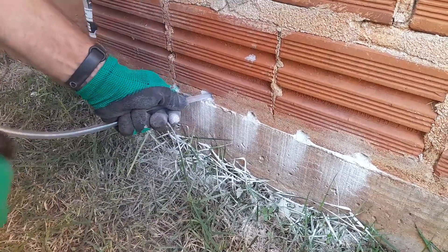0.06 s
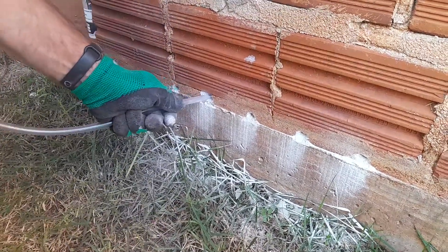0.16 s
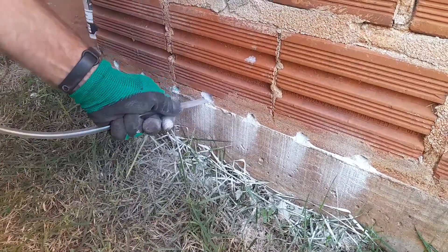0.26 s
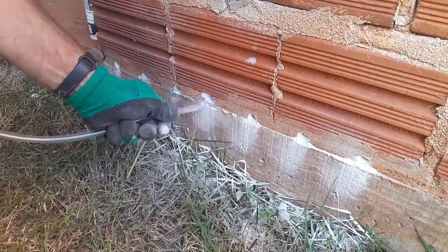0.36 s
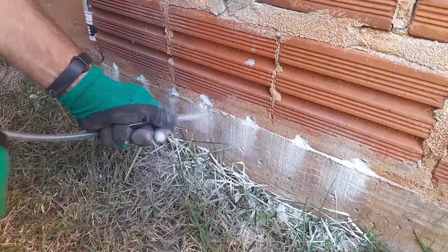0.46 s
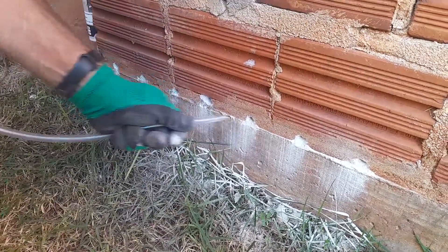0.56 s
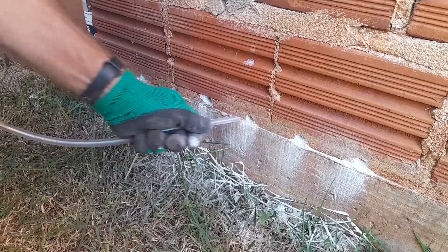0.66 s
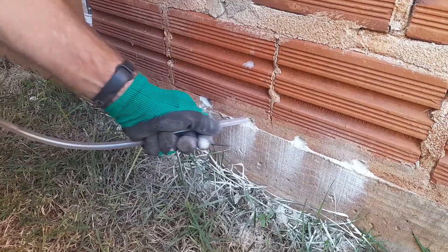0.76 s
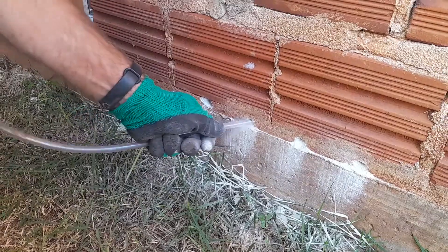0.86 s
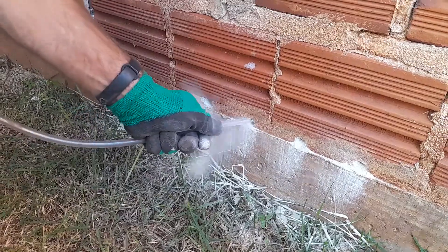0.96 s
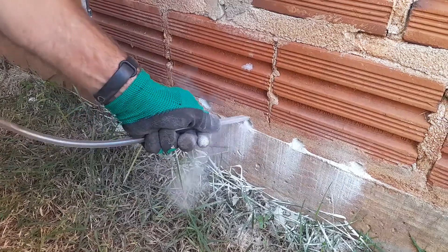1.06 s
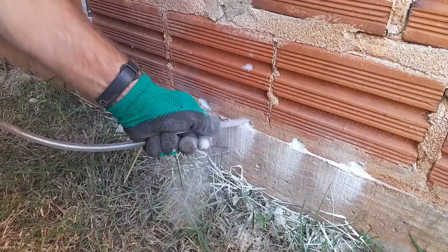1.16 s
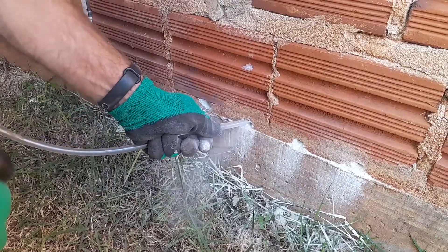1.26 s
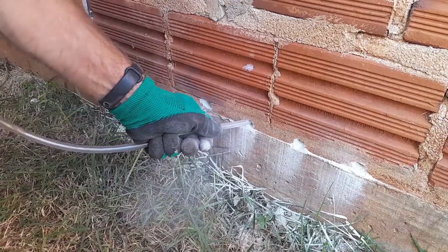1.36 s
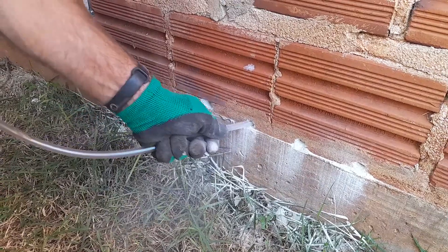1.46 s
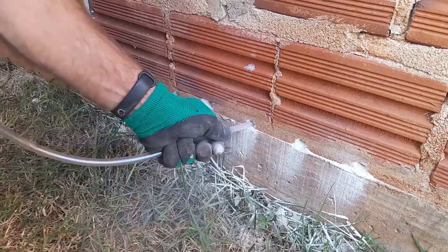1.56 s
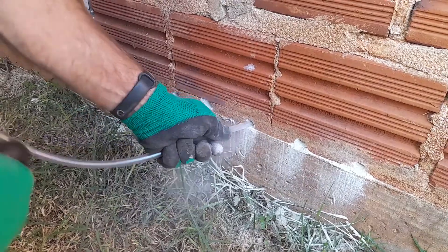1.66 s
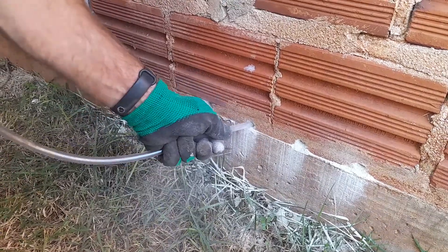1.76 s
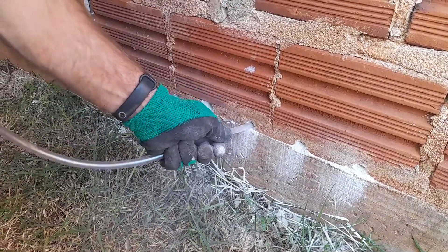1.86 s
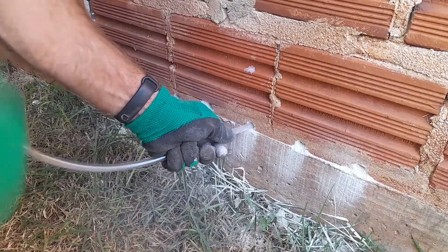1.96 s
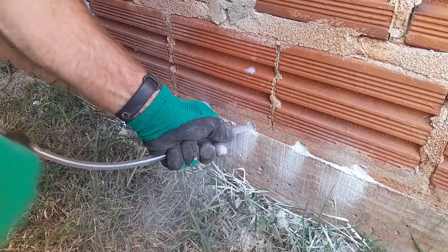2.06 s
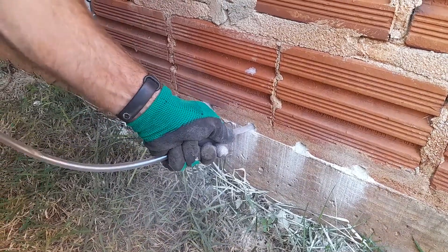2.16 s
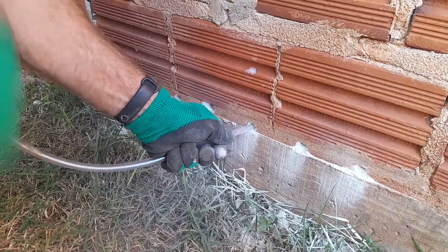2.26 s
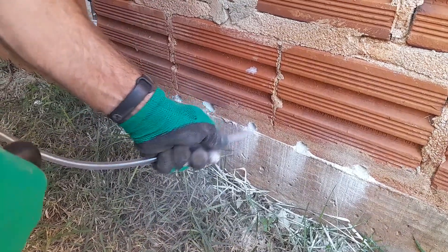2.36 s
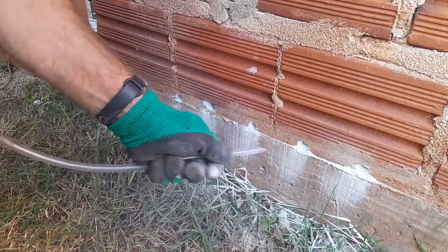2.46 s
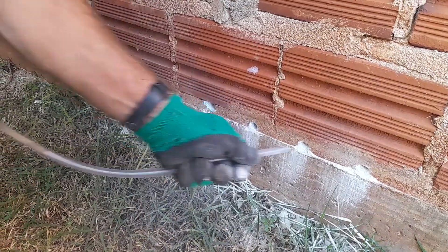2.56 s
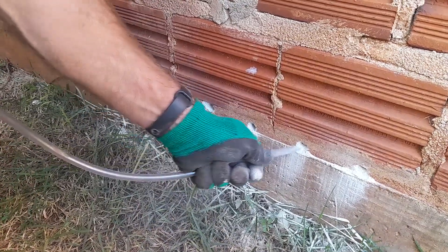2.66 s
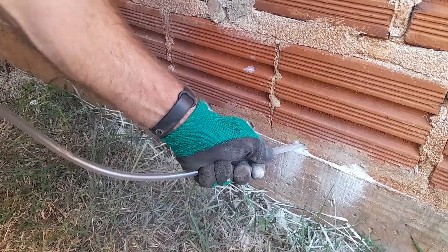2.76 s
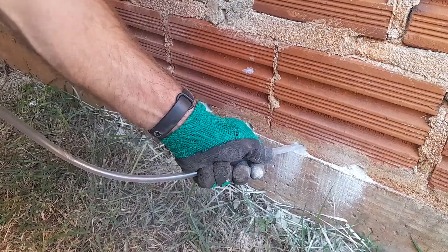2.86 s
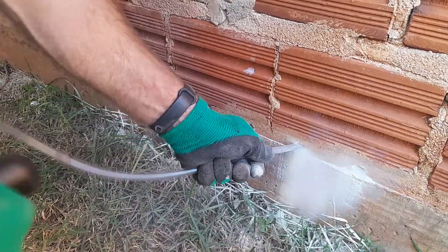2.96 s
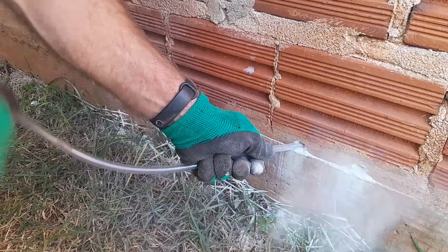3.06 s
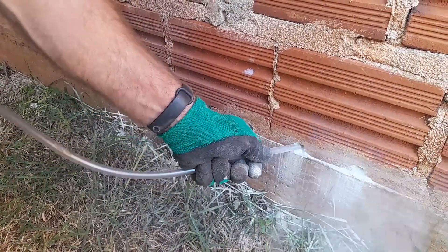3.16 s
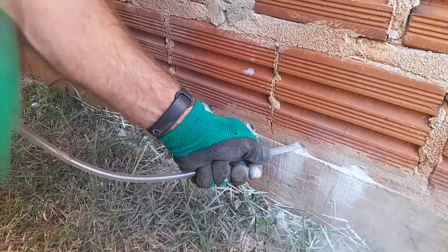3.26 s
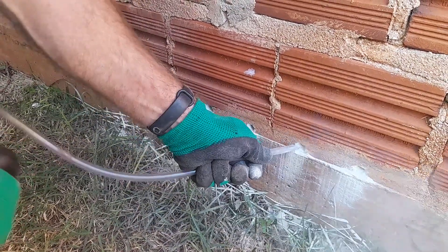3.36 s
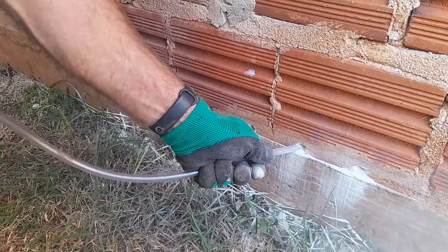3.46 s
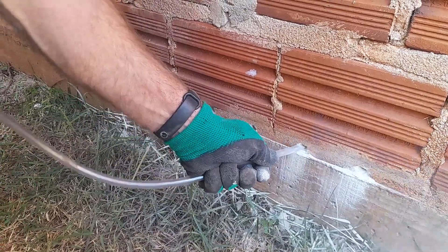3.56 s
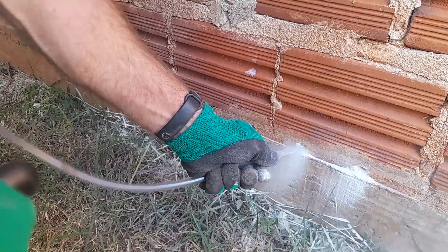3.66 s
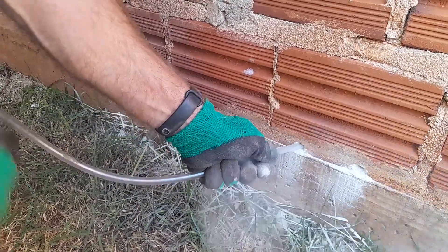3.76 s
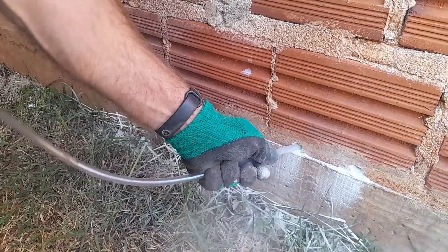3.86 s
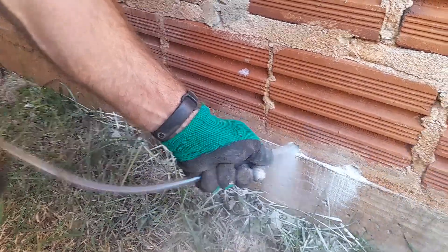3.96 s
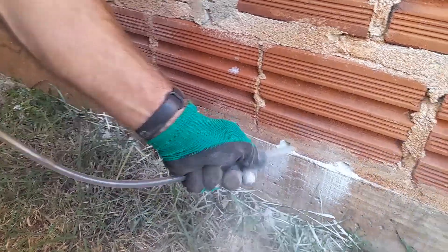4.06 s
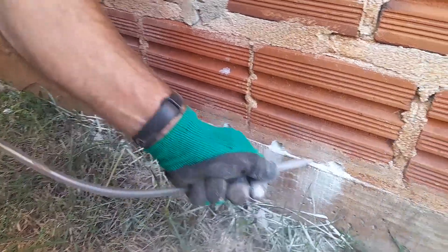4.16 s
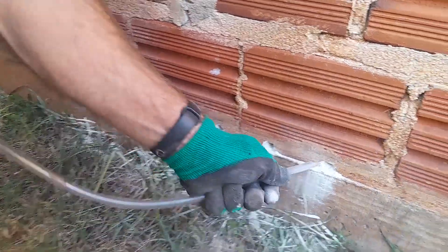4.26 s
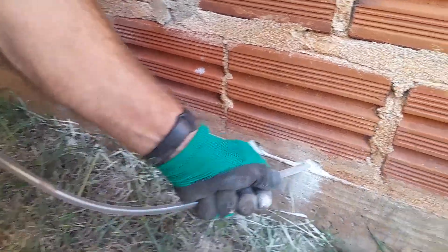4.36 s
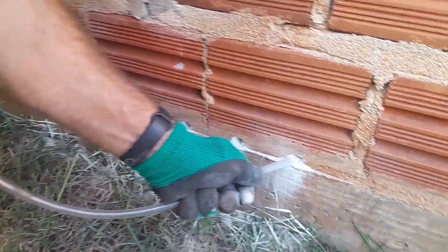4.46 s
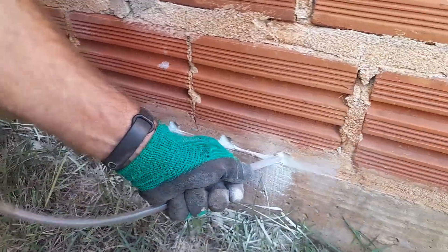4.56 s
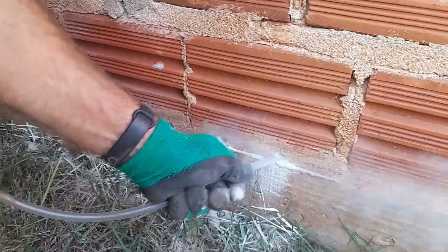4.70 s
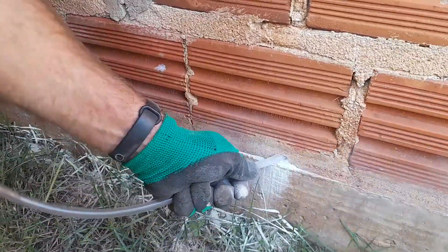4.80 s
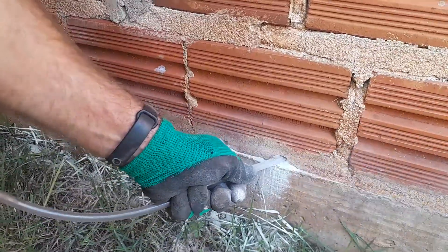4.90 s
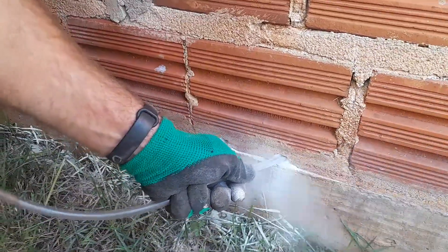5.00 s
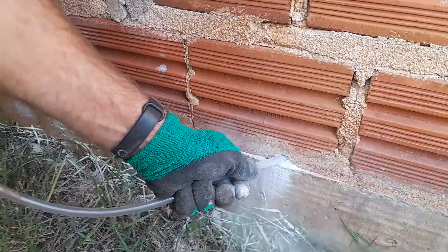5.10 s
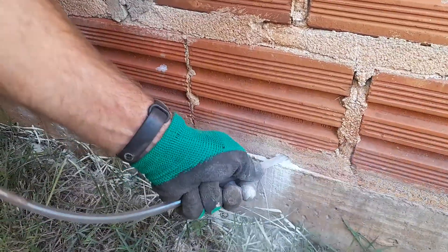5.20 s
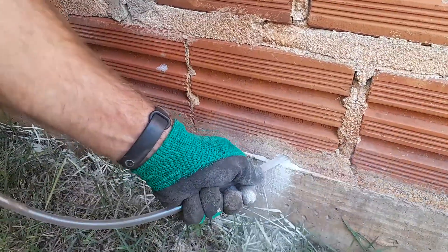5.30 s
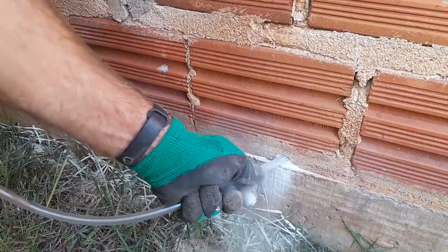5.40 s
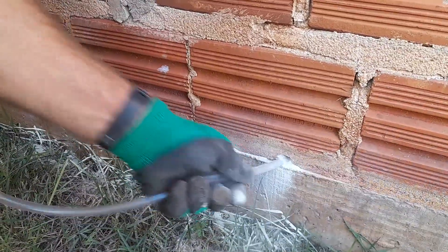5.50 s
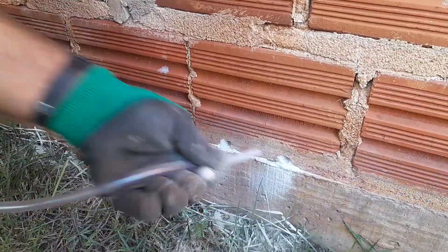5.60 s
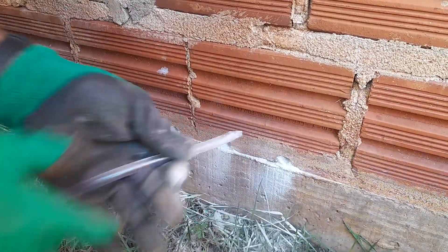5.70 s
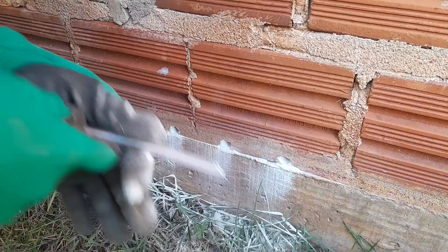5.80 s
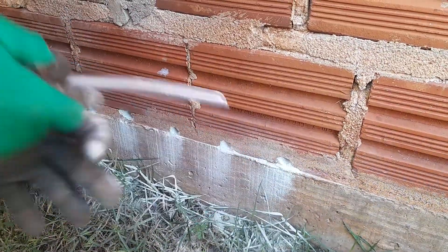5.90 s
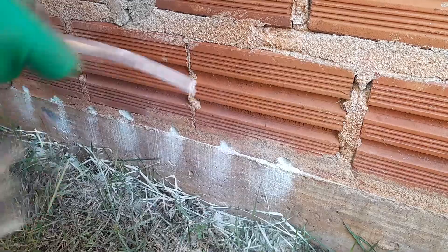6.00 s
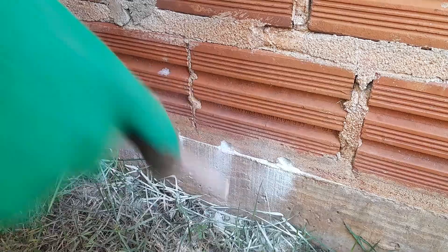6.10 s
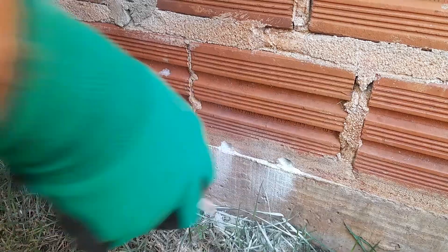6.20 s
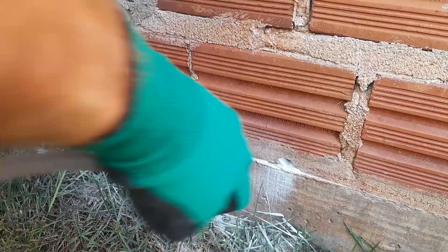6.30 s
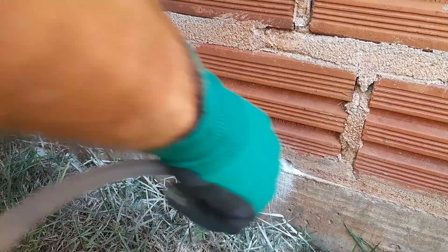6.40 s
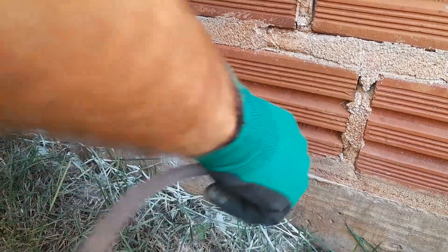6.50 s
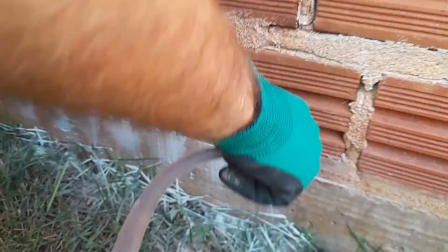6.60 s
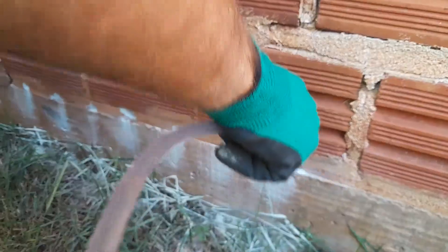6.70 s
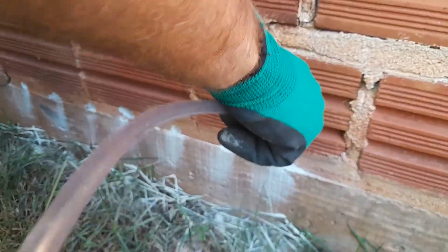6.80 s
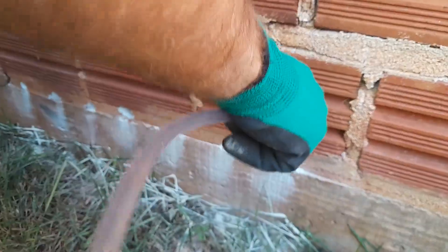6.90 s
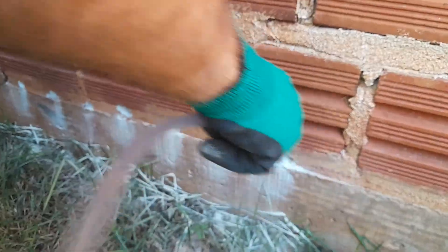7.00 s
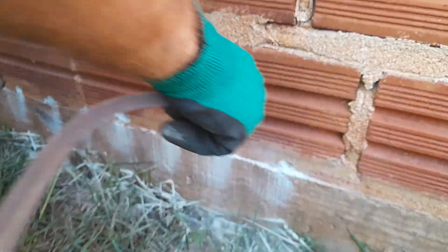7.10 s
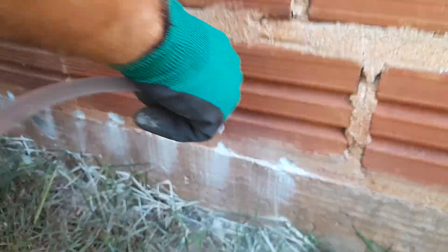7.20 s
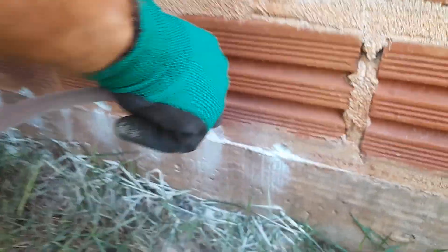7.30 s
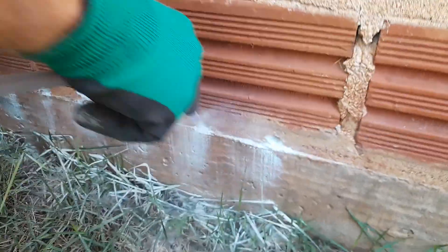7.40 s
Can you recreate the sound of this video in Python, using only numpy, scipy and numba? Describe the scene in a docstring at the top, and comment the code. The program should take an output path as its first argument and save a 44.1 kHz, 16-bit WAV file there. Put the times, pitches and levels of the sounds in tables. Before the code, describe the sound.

Quick, sharp puffs of air hiss from a hand pump's hose into holes in a wall, with clicks, knocks and one short break.

```python
"""A yard, at a brick wall: a hand pump, left of a phone, puffs air through its hose into drilled holes.
Each quick push swells to a hissing jet; most bring a knock of the piston and a thump of the hose air.
Each pull is a softer rub and intake in the barrel. Rod and valve tick at the turns, a glove rustles
in a pause; faint outdoor hiss and low rumble lie underneath."""
import sys
import numpy as np
from scipy import signal
from scipy.fft import rfft, irfft, next_fast_len
from scipy.io import wavfile
from scipy.ndimage import uniform_filter1d, map_coordinates
from numba import njit

SR = 44100
rng = np.random.default_rng(int(sys.argv[2]) if len(sys.argv) > 2 else 0)


def wrap_up_sound(samples):
    """Save the sound to the file named by the first command line argument, as 16-bit audio."""
    columns = np.atleast_2d(samples).T
    # keep every value between -1 and 1, then stretch to whole-number steps
    tamed = np.clip(columns, -1, 1)
    steps = np.round(tamed * 32767).astype(np.int16)
    wavfile.write(sys.argv[1], SR, steps)


N = 328545

# hose air column, near odd quarter waves: f/Hz, level/dB, t60/s
HOSE_MODES = [(98.8, -10.5, 0.067), (255, -15, 0.03), (450, -21.5, 0.044)]
# pump barrel (2 thud, 3 body, 4 clatter modes): f/Hz, level/dB, t60/s
BARREL_MODES = [(127, -15, 0.033), (178.2, -13.5, 0.081), (310, -9, .02), (600, -6, .009), (1060, 0, .009),
                (1500, 0.5, 0.016), (1950, -3, 0.011), (2796, -4, 0.023), (4070, -8.5, .008)]
BARREL_WALL_HZ = (BARREL_MODES[4][0], BARREL_MODES[6][0])


def undb(db):
    """dB to gain."""
    return 10 ** (np.asarray(db) / 20)


def level(x, db):
    """Scale to an rms level."""
    return x * undb(db) / np.sqrt(np.mean(x ** 2))


@njit
def svf(x, hz, width_hz):
    """State-variable band-pass, unity gain at its moving centre."""
    y, band, low = np.empty(len(x)), 0., 0.
    for i in range(len(x)):
        g, damping = np.tan(np.pi * hz[i] / SR), width_hz / hz[i]
        v = (band + g * (x[i] - low)) / (1 + g * (g + damping))
        band, low = 2 * v - band, low + 2 * g * v
        y[i] = damping * v
    return y


def bandpass(x, hz, width_hz):
    """Mono or stereo band-pass; centre steady or moving."""
    return np.apply_along_axis(svf, -1, x, hz * np.ones(x.shape[-1]), float(width_hz))


def walk(rate_hz):
    """Random steps, smoothed twice; spread near 1."""
    hold = int(SR / rate_hz)
    steps = np.repeat(rng.standard_normal(N // hold + 1), hold)
    return 1.185 * uniform_filter1d(uniform_filter1d(steps, hold), hold)[:N]


def curves(rows):
    """Rows of (t/s, values...) to one per-sample curve per value."""
    times_s, *columns = np.transpose(rows)
    return [np.interp(np.arange(N) / SR, times_s, column) for column in columns]


def stroke_curves(strokes, fade_s=0.0047):
    """Curves of all strokes; the first, the level, drops to -100 dB between them."""
    rows = []
    for stroke in strokes:
        first, last = stroke[0], stroke[-1]
        rows += [(first[0] - fade_s, -100, *first[2:]), *stroke, (last[0] + fade_s, -100, *last[2:])]
    return curves(rows)


def hiss(spectrum, alike_hz, flicker_db, rate_hz, band_hz, trim_db=lambda hz: 0):
    """Noise in flickering half octaves, rms near 1 in band_hz; channels diverge above alike_hz."""
    size = next_fast_len(N)
    f = np.fft.rfftfreq(size, 1 / SR) + 1e-9
    hz, db = np.transpose(spectrum)
    shape = undb(np.interp(np.log(f), np.log(hz), db))
    alike = 1 / (1 + f / alike_hz)
    mid, side = (rfft(rng.standard_normal(size)) * shape for _ in range(2))
    pair = np.sqrt(1 + alike) * mid + np.sqrt(1 - alike) * side * np.array([[1], [-1]])
    inside = (f > band_hz[0]) & (f < band_hz[1])
    pair /= np.sqrt(4 * np.sum(shape[inside] ** 2) / size)
    out = 0
    for centre_hz in 90 * 2 ** np.arange(0, 8, .5):
        window = np.cos(np.pi * np.clip(np.log2(f / centre_hz), -.5, .5)) ** 2
        out += irfft(pair * window)[:, :N] * undb(trim_db(centre_hz) + flicker_db * walk(rate_hz))
    return out


def ring(modes, detune, length_s=.15):
    """Decaying sines, peak 1; modes: f/Hz, level/dB, t60/s."""
    t = np.arange(int(length_s * SR)) / SR
    y = sum(undb(db) * np.sin(2 * np.pi * hz * ratio * t) * 1000. ** (-t / t60_s)
            for (hz, db, t60_s), ratio in zip(modes, detune))
    return y / np.max(np.abs(y))


def add(line, start_s, sound):
    """Mix a sound into a line."""
    i = int(start_s * SR)
    line[i:i + len(sound)] += sound[:len(line) - i]


def near_wall(x, right_db, lag_samples, echo_db, t60_s):
    """Source on the left: later and duller on the right; wall and ground scatter briefly."""
    t = np.arange(int(.08 * SR)) / SR
    scatter = undb(echo_db) * rng.standard_normal((2, len(t))) * 1000. ** (-t / t60_s) * (t > .001)
    bass = signal.sosfilt(signal.butter(2, 330, fs=SR, output="sos"), x)
    upper = x - bass
    direct = np.array([upper, undb(right_db) * np.roll(upper, lag_samples)])
    return bass * undb([[1.3], [-1.3]]) + direct + signal.fftconvolve(upper[None], scatter)[:, :N]


def yard():
    """Faint outdoor hiss over a wavering low rumble."""
    # rumble envelope: t/s, level/dB
    rumble_envelope = [(0.0, -50), (0.37, -64), (0.46, -51), (0.66, -64), (0.91, -63), (1.08, -49),
                       (1.18, -61.5), (1.39, -67), (1.72, -49.5), (1.89, -56.5), (2.55, -57.5), (2.82, -65),
                       (3.05, -60), (3.19, -55), (3.32, -59), (3.44, -46.5), (3.65, -68), (3.78, -59.5),
                       (3.9, -50), (4.01, -58), (4.25, -55.5), (4.36, -77), (4.5, -70), (4.71, -64.5),
                       (4.85, -52), (4.94, -63.5), (5.08, -54), (5.23, -58.5), (5.35, -50), (5.71, -65.5),
                       (6.16, -68.5), (6.35, -67), (6.79, -53), (7.1, -63), (7.2, -51.5), (7.32, -61),
                       (7.45, -47)]
    # outdoor hiss: f/Hz, density/dB
    yard_spectrum = [(190, -36.5), (330, -6.5), (358, -3), (1250, -14.5), (1650, -1.5), (3260, -11.5),
                     (8630, -5), (16000, -15)]
    db, = curves(rumble_envelope)
    noise = rng.standard_normal((2, N))
    noise[1] = noise[0] + .54 * noise[1]
    rumble = bandpass(noise, 68, width_hz=37) + .7 * bandpass(noise, 125, width_hz=40)
    rumble = bandpass(bandpass(rumble, 85, width_hz=140), 85, width_hz=110)
    rumble = level(rumble, 0) * undb(db + 4.4 * walk(22))
    air = hiss(yard_spectrum, alike_hz=400, flicker_db=2.5, rate_hz=12, band_hz=(200, 16000))
    return rumble + undb(-71) * air


def push_jet():
    """Turbulent air from the tip rings the hole; the hose hums and the washer slides."""
    # per push: t/s, hiss/dB, middle re hiss/dB, top re hiss/dB, left minus right/dB
    pushes = [
        [(0.0, -71, 6, -12, 2), (0.006, -65, 1, -16, 4), (0.124, -24.5, -2, -4, 3), (0.144, -29.5, -2, -8, 2.0),
         (0.188, -56.5, 6, -7, 2.0), (0.2, -110, 4, -5, 7)],
        [(0.36, -83, 11, 3, 7), (0.42, -41, -2, -9, 4.5), (0.462, -30.5, 4, -1, 3), (0.494, -28.5, 1, 7.5, 2),
         (0.52, -35.5, -2.5, -4, 0), (0.54, -62, 5, -1, 7), (0.58, -64, 6, -6, 1)],
        [(0.83, -81, 10, -3, 11), (0.864, -55.5, -3.5, -8, 6), (0.926, -30, -3, 0, 3), (0.978, -28, -1, -3, 2),
         (1.0, -30, -2, -5, 5.5), (1.04, -64.5, 3, -10, -3)],
        [(1.21, -88, 14, -4, 8), (1.236, -64.5, 5, 4, 8), (1.312, -30.5, 0, -0.5, 2.0),
         (1.354, -29.5, 0.5, 0, 1.5), (1.37, -31, -0.5, -5, 0.5), (1.41, -66.5, 4.5, -3.5, 5)],
        [(1.6, -92, 21, -2, 2.0), (1.612, -68.5, 6, -4, 6), (1.676, -39, 4, -3, 5), (1.728, -28, 0, -4.5, 0.5),
         (1.79, -66.5, 8.5, -10, 6)],
        [(1.95, -70.5, 0, -9, 6), (2.046, -35.5, 3, -3, 4.5), (2.092, -30.5, -2, -5, 1),
         (2.122, -43.5, 4, -13, 1.5), (2.132, -64, 9, -3, 3), (2.15, -62, 3, -7, 4)],
        [(2.29, -76.5, 6.5, -7, 4.0), (2.362, -37, -1.5, -9, 7), (2.4, -24, -1.5, -10.5, -1),
         (2.42, -27.5, -3.5, -15.5, 3), (2.456, -68, 15, -1, 1.0), (2.48, -70, 6, -13, 2)],
        [(2.85, -105, 13, -6, 7), (2.888, -89, 9, -3, 16), (2.916, -59, -5, -7, 8.5),
         (2.97, -38, -0.5, -4.5, 2.5), (3.034, -25, -3.5, -7.5, 1), (3.068, -31.5, -2, -7, 2.5),
         (3.1, -62, 5, -11, 2.0)],
        [(3.27, -78, 11, -3, 2.5), (3.274, -71.5, 0, -11, 9), (3.348, -34.5, -1, -2.5, 2),
         (3.394, -26.5, -2.5, 2.5, 1.5), (3.416, -22, -5, -2.5, 0.5), (3.47, -56, -1, -6, 2.5)],
        [(3.63, -88, -4, -11, 3.0), (3.638, -69.5, 14, -4, 8), (3.658, -58.5, -1, -7, 3),
         (3.71, -32.5, 2.5, -7, 0), (3.764, -26.5, 1, -5.5, 0.5), (3.81, -56, 1.5, -12, 7)],
        [(3.95, -68, 5, -4, 0.0), (3.984, -64, 10, -1, 7), (4.0, -44.5, -1, -11, 6), (4.062, -27.5, 1, -10, -1),
         (4.108, -54.5, 2.5, -6, -0.5), (4.15, -65, 8, -8, 4.0)],
        [(4.53, -89.5, 7, 0, 10), (4.636, -36, -2.5, -5.5, 3), (4.68, -23, -7, -9.5, 2.5),
         (4.724, -25, -4.5, -4.5, 2.5), (4.746, -35, -2, -9, 2), (4.764, -56.5, 6, -15, 6),
         (4.79, -59, 1, -9, 2.5)],
        [(4.94, -67.5, 4, -11, 4.0), (4.942, -78, 8, -10, 6.5), (5.032, -30.5, -1, -7.5, 2),
         (5.072, -25, 1, -7, 1), (5.092, -29.5, -1, -5.5, 1.5), (5.14, -76, 15.5, -4.5, 5)],
        [(5.31, -73, 11.5, -4, 14), (5.324, -69, 5.5, -4.5, 8), (5.386, -38.5, 4.5, -2.5, 0),
         (5.41, -31.5, -2.5, -9.5, 2.5), (5.42, -26, 1, -4.5, -1.5), (5.504, -88, 17, -7.5, 6.5),
         (5.53, -86.5, 22, 2, 15)],
        [(6.58, -82, 8, -5, 15), (6.586, -70.5, 5, -4, 13), (6.628, -49, -2, -10, 10), (6.672, -38, -5, -4, 1),
         (6.708, -31, 0.5, 1, 2), (6.754, -27.5, -5, -4, 2), (6.8, -62, 2, -5, 4)],
        [(6.98, -78, 10, -2, 20), (7.002, -51.5, 2.5, -10, 7.5), (7.094, -26.5, -2.5, 4, 1),
         (7.128, -29, -2.5, 1, 0), (7.16, -59, 3.5, -6, 6), (7.18, -63, 5, -6, 4.0)],
        [(7.35, -69, 4, -10, 4.0), (7.37, -56, -1, -19, 10.5), (7.426, -41, 3.5, -2, 4),
         (7.45, -32, 1.5, -5, 1.0)],
    ]
    # aim of the tip: t/s, left delay/us, hole tuning ratio, hole ring/dB
    tip_aim = [(0.109, -68, 1.22, 5.5), (.47, -48, 1.04, -16.5), (.96, -11, 1.04, -3.5),
               (1.33, -18, 1.04, 1.5), (1.7, -17, 1.05, -0.5), (2.065, -10, 1.08, -2.5),
               (2.38, -15, 0.95, -9), (3.03, 52, 1.03, 0), (3.385, 53, 1.04, 3.5), (3.73, 61, 1.07, -2.5),
               (4.03, 49.5, 0.98, -6.5), (4.7, 16.5, 1.03, 2.5), (5.05, 27, 0.98, -6.5), (5.4, 29.5, 1, -3),
               (6.73, 63.5, 0.96, 2.5), (7.09, 28, 1, -6.5), (7.43, 20, 1., -19.5)]
    # jet noise: f/Hz, density/dB
    jet_spectrum = [(71, -45.5), (120, -6), (272, -1.5), (355, -10), (454, -4.5), (670, -10), (1520, -3.5),
                    (1650, -3), (2200, -6.5), (3050, -5), (4230, -5), (8840, 0.5), (16000, -8.5)]
    # drilled hole: f/Hz, width/Hz, level/dB
    hole_modes = [(1710, 86, -21.5), (2906, 590, -6.5), (5790, 210, -13), (8430, 300, -11.5)]
    db, middle_db, top_db, pan_db = stroke_curves(pushes)
    lag_us, tuning, ring_db = curves(tip_aim)

    def trim_db(hz):
        middle = np.interp(np.log(hz), np.log([300, 900, 4000, 5500]), [.3, 1, 1, 0])
        top = np.interp(np.log(hz), np.log([8500, 12000]), [0, 1])
        return middle * (middle_db + 2.5) + top * (top_db + 6.5)

    air = hiss(jet_spectrum, alike_hz=17900, flicker_db=2.04, rate_hz=45, band_hz=(5000, 10500),
               trim_db=trim_db)
    # each round trip in the hose inverts the noise
    trip_samples, trip_gain = int(SR / (2 * HOSE_MODES[0][0])), -.22
    air = sum(np.roll(air, k * trip_samples, axis=1) * trip_gain ** k for k in range(4))
    drift = tuning + .02 * walk(12)
    hole = 0
    for hz, width_hz, mode_db in hole_modes:
        gain = undb(mode_db + ring_db + 1.93 * walk(9)) * np.sqrt(4000 / width_hz)
        hole += gain * bandpass(air, hz * drift, width_hz)
    left, right = .94 * air + hole
    left = map_coordinates(left, [np.arange(N) - lag_us * 1e-6 * SR], order=3)
    jet = undb(db + np.array([pan_db, -pan_db]) / 2) * np.array([left, right])
    flow = rng.standard_normal(N)
    # the washer sounds through the barrel wall until the jet masks it
    wall = sum(level(bandpass(flow, hz, width_hz=180), -3) for hz in BARREL_WALL_HZ)
    slide_db = np.minimum(db + middle_db - 3, -50) + 3.5 * walk(35)
    slide = undb(slide_db) * np.array([wall, .5 * np.roll(wall, 13)])
    hum = sum(level(bandpass(flow, hz, 3.8 / t60_s), mode_db) for hz, mode_db, t60_s in HOSE_MODES)
    return jet + undb(db - 21.5) * hum + slide


def ticks():
    """Small hard contacts: a pitched snap of noise, a brief ring, a dull tap."""
    # rod, valve and hose tip: t/s, level/dB, f/Hz, tap re level/dB, ring re level/dB
    contacts = [(0.0179, -34, 2030, -1, -8), (0.227, -32, 4170, -17, -1), (0.3756, -42, 1680, 7.5, -11),
                (0.596, -34.5, 1860, -12, -2), (0.8355, -47, 1750, -26, 1), (1.052, -38, 1950, -7, -5),
                (1.2165, -37, 1850, -10, -7), (1.296, -19, 3060, -6, -7), (1.4251, -23.5, 1760, -28, -7),
                (1.6048, -43.5, 2060, 6, -7), (1.6691, -16.5, 3830, -16, -8),
                (1.8015, -28.5, 1950, -16, -4), (1.9602, -35.5, 2060, -4, -10),
                (2.0334, -12.5, 2900, -16, -10), (2.1144, -15.5, 2070, -18, -8),
                (2.1852, -25, 2700, -7.5, -12), (2.3012, -36.5, 2150, 1, -7), (2.3533, -12, 3140, -20, -9),
                (2.5508, -26.5, 1990, -26, -4), (2.754, -34.5, 1860, -34, 4), (2.83, -45, 1890, -18, -1),
                (3.1079, -20, 3620, -21, 0), (3.278, -38, 2080, -11, -4), (3.3523, -11.5, 3700, -15, -11),
                (3.4823, -32, 1770, -17, -6), (3.6396, -37.5, 1890, -2, -7), (3.704, -12, 2980, -23, -6),
                (3.963, -36.5, 1850, 3, 0), (4.0047, -17.5, 3340, -12, -15), (4.1142, -32.5, 1560, -4, -7),
                (4.1929, -26, 2950, -15, -6), (4.3818, -33.5, 1850, -42, 1), (4.4332, -42, 1670, -19, -1),
                (4.7982, -39, 1820, -2, -3), (4.9545, -38, 1790, -4, -1), (5.023, -15, 2770, -15, -13),
                (5.1627, -27.5, 1770, -30, -2), (5.3147, -40, 1970, -13, 0), (5.3777, -23.5, 2830, -6, -3),
                (5.6077, -46, 2020, -6, -1), (5.7863, -35, 2500, -14, -10), (5.807, -33.5, 3260, -19, -2),
                (6.24, -47, 2530, -17.5, -6.5), (6.2635, -42, 1970, -21, -3), (6.5885, -36, 1990, -19, -7),
                (6.7037, -15, 3250, -21, -8), (6.9875, -32.5, 2080, -14, -3), (7.0723, -14, 3150, -14, -7),
                (7.1904, -35, 1830, -7, -7), (7.232, -24.5, 1980, -26, -0.5), (7.3645, -35, 2030, -8, -5)]
    line = np.zeros(N)
    t = np.arange(700) / SR
    chatter = 1000. ** (-np.clip(t - .002, 0, None) / .012)  # parts settle after 2 ms
    for start_s, db, hz, tap_db, ring_db in contacts:
        noise = rng.standard_normal(len(t))
        burst = noise * chatter
        snap = bandpass(burst, hz, 1.5 * hz) + undb(-7.5) * np.gradient(burst)
        ping = ring([(hz, 0, 52 / hz), (1.75 * hz, -10, 20 / hz)], 1 + .02 * noise)
        tap = ring([(770, 0, .014), (1250, -2, .017)], 1 + .11 * noise[3:])
        add(line, start_s, level(snap, db - 16.5))
        add(line, start_s, undb(db + ring_db) * ping + undb(db + tap_db) * tap)
    return near_wall(line, right_db=-6.5, lag_samples=17, echo_db=-35, t60_s=.05)


def piston_knocks():
    """The piston hits the end cap with a crack, rebounds twice and rattles a few ms."""
    # end-cap hits: t/s, level/dB, brightness/dB, thud re level/dB
    hits = [(0.124, -11.5, 6, -16), (0.486, -14.5, 1.5, -16.5), (1.35, -19, 10, -11),
            (1.723, -17, 8.5, -12.5), (2.088, -23.5, 8.5, -9), (2.397, -14, 5.5, -11),
            (3.408, -19.5, 7.5, -7.5), (3.75, -15.5, 9, -13), (4.057, -12.5, 8.5, -15),
            (5.072, -16.5, 9.5, -16.5), (5.42, -13, 6, -15.5), (7.108, -15.5, -6, -16)]
    line = np.zeros(N)
    t = np.arange(600) / SR
    for start_s, db, bright_db, thud_db in hits:
        noise = rng.standard_normal(len(t))
        body = undb(db + 3.5) * ring(BARREL_MODES[2:5], 1 + .046 * noise)
        add(line, start_s, body)
        add(line, start_s + .0014 * (1 + .068 * noise[-1]), -.9 * body)
        add(line, start_s + .0024 * (1 + .06 * noise[-2]), .3 * body)
        rattle = noise * (np.abs(noise) > 1.2) * (t < .0035)
        rattle[0] = 4.9  # first contact
        clatter = np.convolve(rattle, ring(BARREL_MODES[5:], 1 + .036 * noise[5:]))
        crack = uniform_filter1d(noise[::-1], size=3) * 1000. ** (-t / .012)
        bright_gain = undb(db + bright_db - 3)
        add(line, start_s, bright_gain * clatter / np.max(np.abs(clatter)))
        add(line, start_s, bright_gain * crack)
        add(line, start_s, undb(db + thud_db) * ring(BARREL_MODES[:2], 1 + .057 * noise[9:]))
    return near_wall(line, right_db=-12, lag_samples=11, echo_db=-40.5, t60_s=.082)


def hose_thumps():
    """The hose air swings a few times when the flow stops."""
    # flow stops: t/s, level/dB
    stops = [(0.153, -29), (1.013, -22), (1.403, -40), (1.775, -35), (2.118, -23.5), (3.076, -21),
             (3.442, -24.5), (3.783, -21), (4.108, -33), (4.757, -31), (5.121, -37.5), (5.53, -41),
             (6.781, -32), (7.164, -42)]
    line = np.zeros(N)
    for start_s, db in stops:
        detune = 1 + .082 * rng.standard_normal(len(HOSE_MODES))
        add(line, start_s, undb(db) * ring(HOSE_MODES, detune))
    return uniform_filter1d(line, 40) * undb([[.8], [-.8]])


def pull_intake():
    """The washer rubs up the barrel, air leaks past; the column above shortens, so its tones rise."""
    # per pull: t/s, hiss/dB, rub re hiss/dB
    pulls = [
        [(0.2, -57, 7.5), (0.272, -40, -3.5), (0.316, -43.5, 0.5), (0.348, -50.5, -3), (0.36, -73, 16)],
        [(0.58, -74, -6), (0.594, -59, 8), (0.644, -47, -3), (0.754, -49.5, 0), (0.81, -57.5, 1.5),
         (0.83, -85, 2)],
        [(1.04, -56, 4), (1.118, -42.5, -4.5), (1.168, -47, 0.5), (1.198, -60, 2), (1.21, -76, 8)],
        [(1.41, -67, -4), (1.42, -50.5, -2), (1.534, -41.5, -2.5), (1.58, -51.5, -0.5), (1.6, -77, 9)],
        [(1.79, -67, 8), (1.8, -50.5, 3), (1.878, -40, -4.5), (1.934, -45.5, -0.5), (1.95, -67, 9)],
        [(2.15, -59.5, 7), (2.202, -43, 0.5), (2.256, -45, -1), (2.282, -55, 0), (2.29, -70, 9)],
        [(2.48, -59, 2.5), (2.546, -52.5, 0.5), (2.56, -39, 1), (2.568, -48.5, 1.5), (2.634, -53.5, -2.5),
         (2.788, -54, 1.5), (2.85, -85, 15)],
        [(3.1, -58, 9), (3.104, -51, 3.5), (3.2, -40.5, -5.5), (3.256, -51, 0.5), (3.27, -73, 3)],
        [(3.47, -56, -6), (3.488, -50, 0), (3.566, -41.5, -7), (3.612, -50, 0.5), (3.63, -65, 5)],
        [(3.81, -53, 6.5), (3.882, -45.5, -0.5), (3.916, -45, -1.5), (3.95, -59, 0)],
        [(4.15, -62.5, 1), (4.202, -50, 2), (4.262, -52, 0.5), (4.358, -63.5, 2), (4.366, -70, 3),
         (4.375, -79, 16)],
        [(4.39, -55, 2), (4.406, -66, 4.5), (4.452, -58, -3), (4.482, -69, 4), (4.53, -83, 18.5)],
        [(4.79, -55, 1), (4.846, -46, -2.5), (4.89, -46, -2.5), (4.93, -56, 2), (4.94, -62, 7)],
        [(5.14, -61, 6), (5.158, -54, 2), (5.258, -43.5, -3.5), (5.294, -56, 0), (5.31, -76, -5)],
        [(6.32, -82, 7), (6.354, -58.5, -1), (6.446, -40, -5), (6.512, -40.5, -5), (6.552, -46.5, 1.5),
         (6.58, -77, 3)],
        [(6.8, -54.5, 2), (6.866, -42.5, -1), (6.924, -37, -7.5), (6.95, -39, 2.5), (6.98, -59, 0)],
        [(7.18, -56, -1), (7.24, -41, -3), (7.286, -37, -8), (7.334, -41, -0.5), (7.35, -57, 5)],
    ]
    # intake noise: f/Hz, density/dB
    intake_spectrum = [(150, -41.5), (250, -5.5), (367, -15.5), (519, -8.5), (875, -12.5), (1080, -9),
                       (1640, -5.5), (1950, -5.5), (2360, -6.5), (2810, -5.5), (4410, -5.5), (10900, -5.5),
                       (16000, -14)]
    start_hz, end_hz = 400, 1080  # air column fundamental
    db, rub_db = stroke_curves(pulls)
    air = hiss(intake_spectrum, alike_hz=500, flicker_db=2, rate_hz=40, band_hz=(4500, 15000),
               trim_db=lambda hz: (hz < 4500) * (rub_db - 1.5))
    progress, = curves([row for pull in pulls for row in ((pull[0][0], 0), (pull[-1][0], 1))])
    travel = np.sin(np.pi / 2 * progress) ** 2  # the hand eases in and out
    period_s = 1 / start_hz + travel * (1 / end_hz - 1 / start_hz)
    wall = sum(undb(5.5 + 3.5 * walk(35)) * bandpass(air, hz, width_hz=160) for hz in BARREL_WALL_HZ)
    tones = 0
    for harmonic in range(1, 9):
        hz = harmonic / period_s
        rolloff_db = 5 * np.clip(hz / 1000 - 3.5, 0, None)
        tones += undb(5.5 * walk(70) - rolloff_db) * bandpass(air, hz, width_hz=90)
    return undb(db + np.array([[2.2], [-2.2]])) * (.8 * air + undb(4.5) * tones + wall)


def glove_rustle():
    """Cloth and dry grass: noise broken into dense grains."""
    # glove and hose shifting: t/s, level/dB
    rustle_envelope = [(5.53, -64), (5.534, -59), (5.602, -66), (5.606, -59.5), (5.694, -65), (5.78, -63),
                       (5.784, -58.5), (5.86, -46.5), (5.87, -57.5), (5.966, -60), (5.988, -51),
                       (6.006, -76.5), (6.252, -93), (6.278, -55.5), (6.32, -76)]
    # cloth noise: f/Hz, density/dB
    glove_spectrum = [(300, -25.5), (900, -8), (2000, -2.5), (4500, -10.5), (16000, -16.5)]
    db, = stroke_curves([rustle_envelope])
    grain_db = 1.5 * np.repeat(rng.exponential(size=N // 60 + 1), 60)[:N]
    cloth = hiss(glove_spectrum, alike_hz=600, flicker_db=1.8, rate_hz=30, band_hz=(900, 8000))
    return undb(db + np.array([[2.5], [-2.5]])) * cloth * level(undb(grain_db), 0)


def scene():
    """All sources at the two microphone ports."""
    pump = push_jet() + pull_intake() + piston_knocks() + ticks() + hose_thumps()
    return pump + glove_rustle() + yard()


def record(dry):
    """The phone trims the deepest bass and cuts the top."""
    low_hz, top_hz = 50, 16050
    trimmed = signal.sosfilt(signal.butter(4, low_hz, "high", fs=SR, output="sos"), dry)
    return signal.sosfilt(signal.ellip(10, .2, 80, top_hz, fs=SR, output="sos"), trimmed)


dry = scene()
out = record(dry)
wrap_up_sound(out)
```